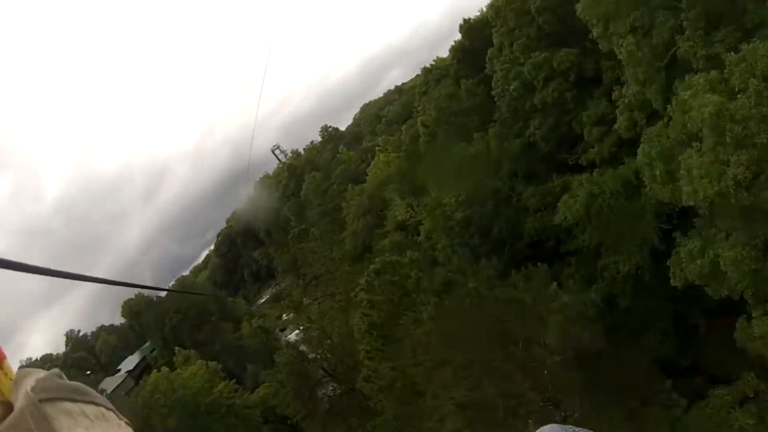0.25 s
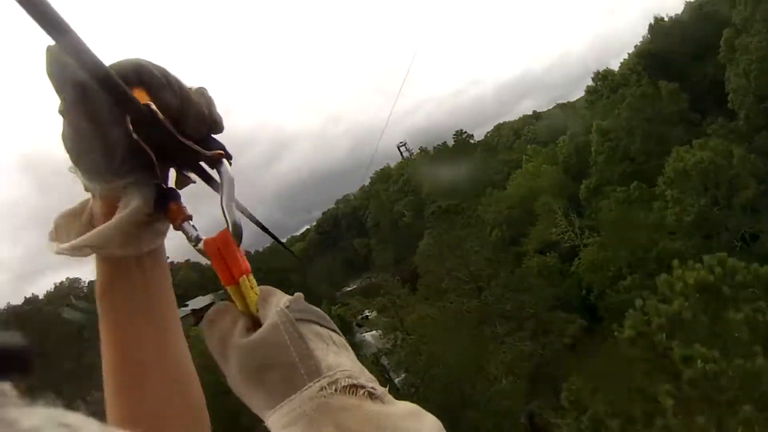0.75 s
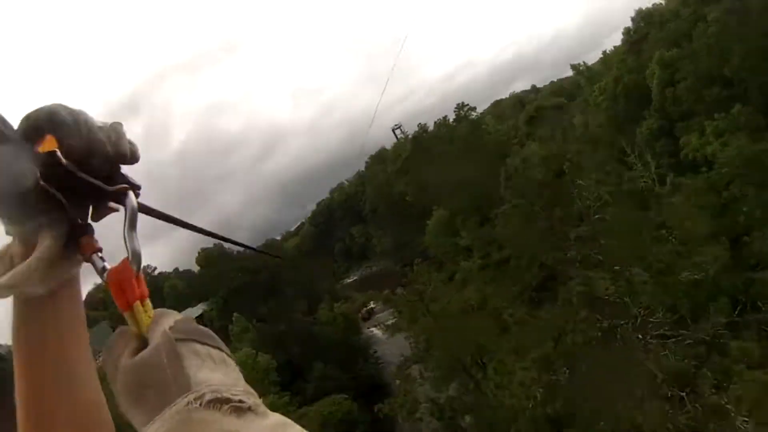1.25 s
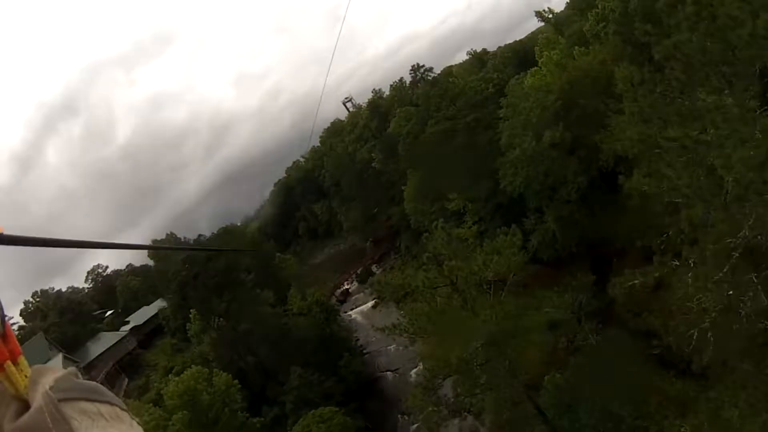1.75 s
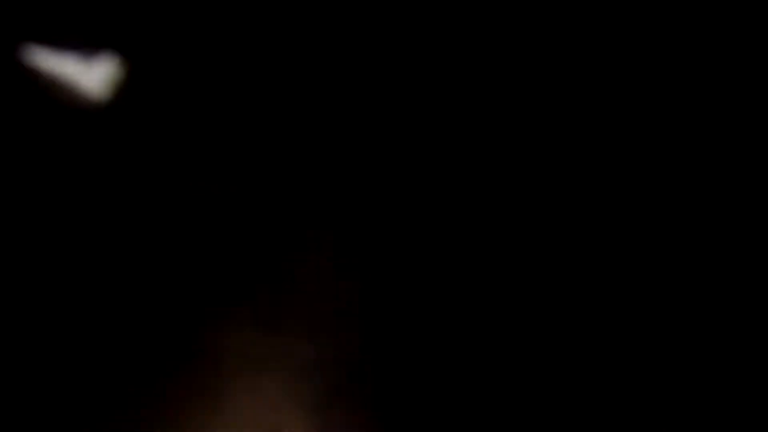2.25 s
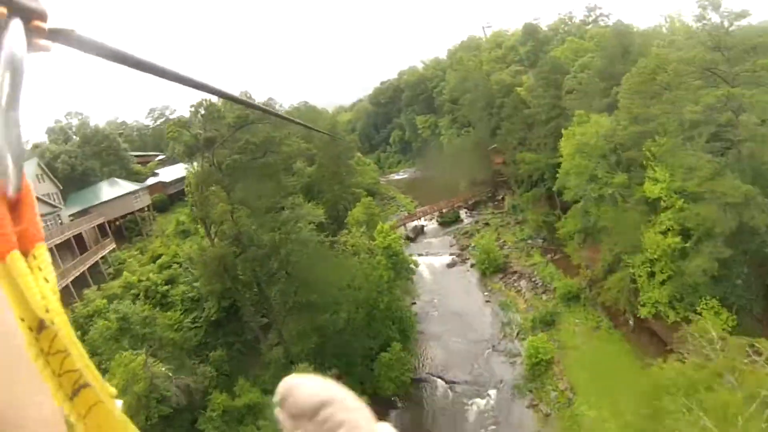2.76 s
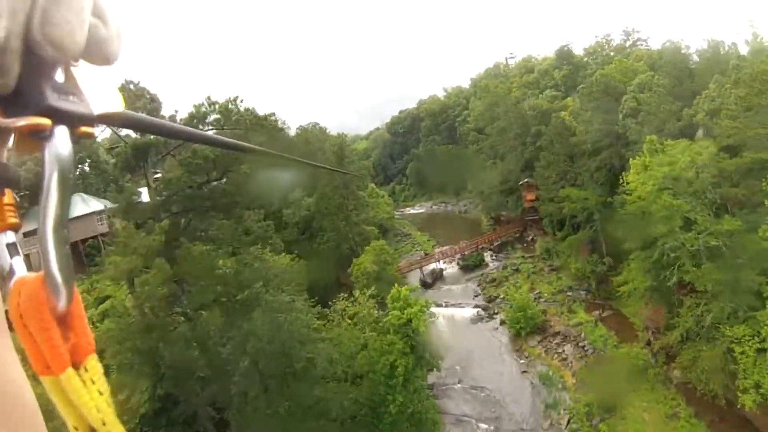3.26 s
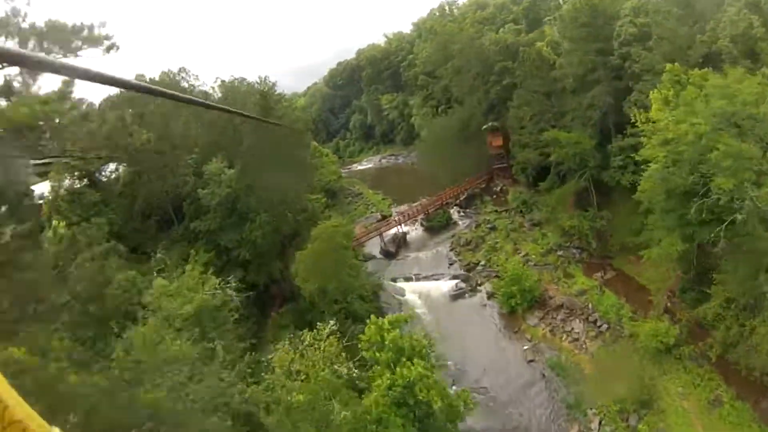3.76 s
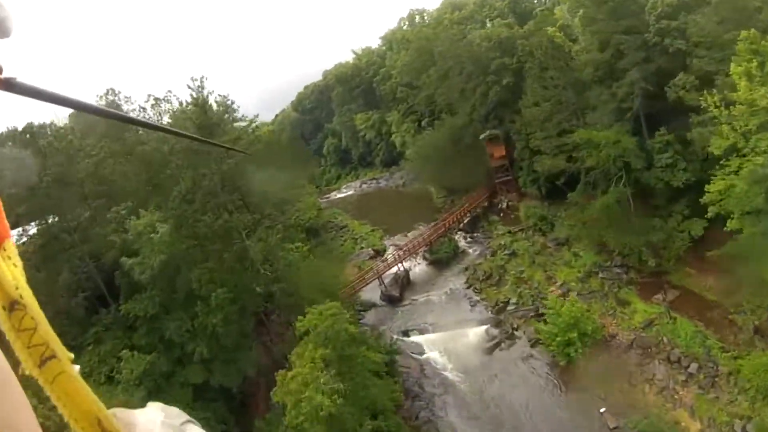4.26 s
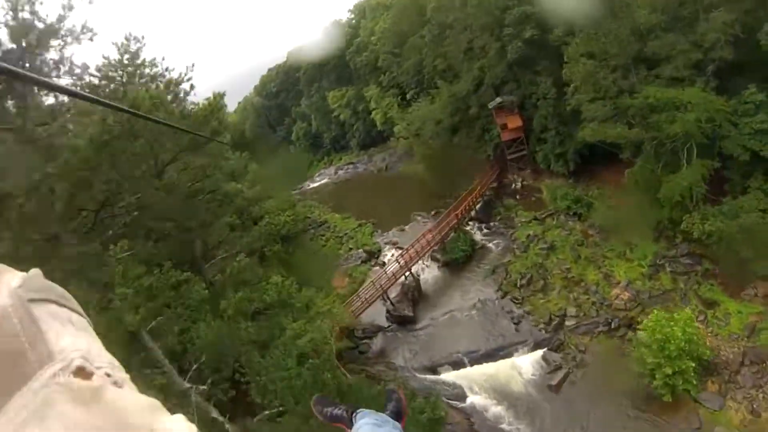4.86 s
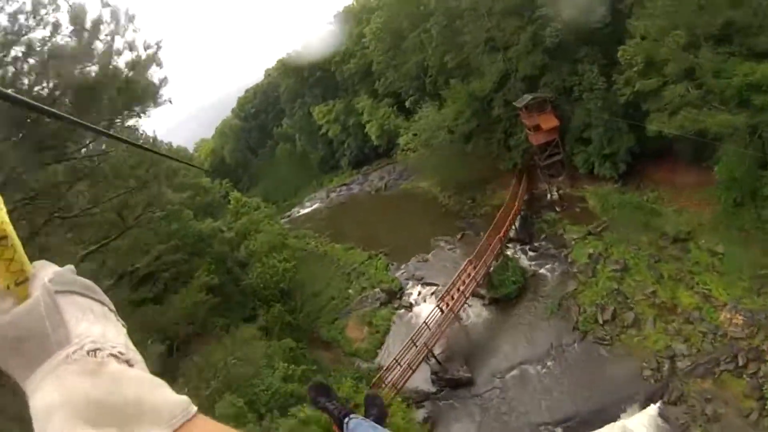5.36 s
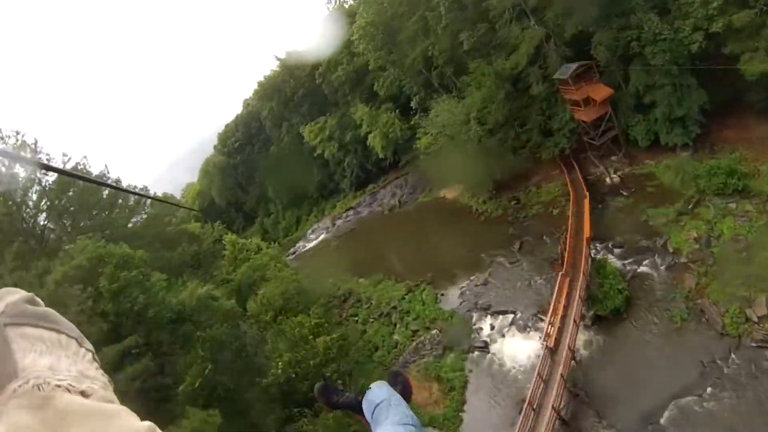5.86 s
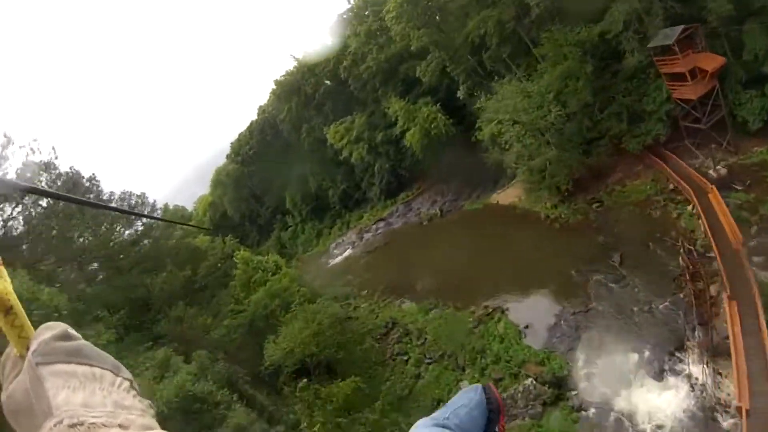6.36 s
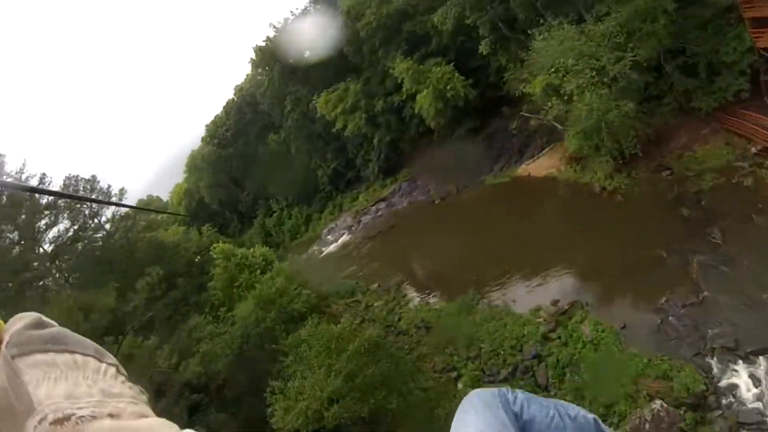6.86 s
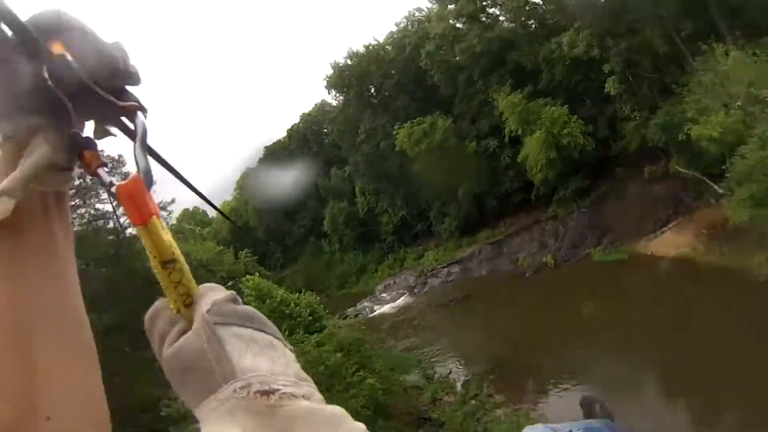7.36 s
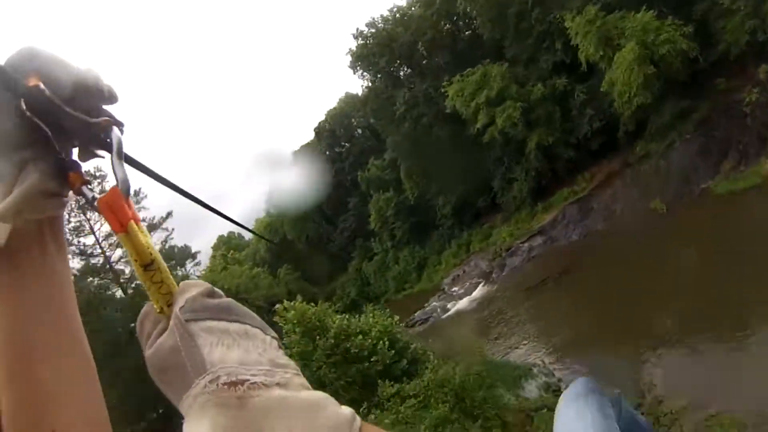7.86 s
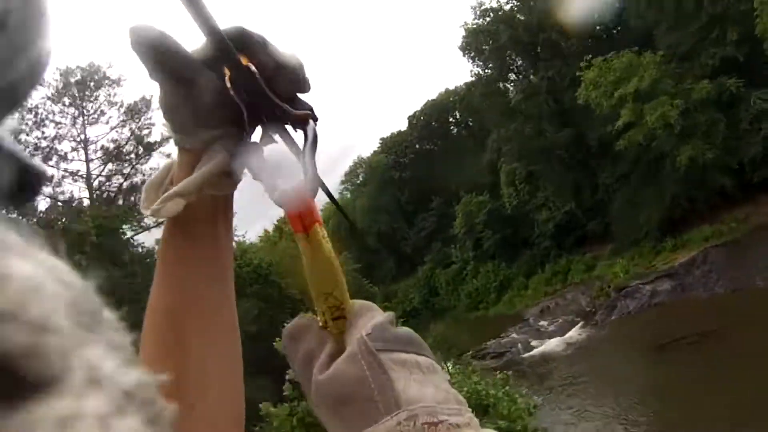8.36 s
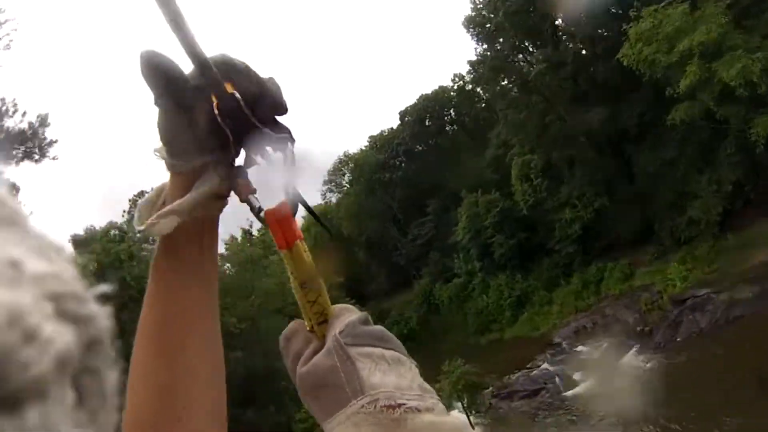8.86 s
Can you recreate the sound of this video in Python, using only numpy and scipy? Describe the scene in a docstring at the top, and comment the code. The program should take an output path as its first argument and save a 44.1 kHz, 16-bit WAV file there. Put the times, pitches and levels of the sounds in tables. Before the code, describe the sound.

A pulley trolley whines down a steel cable, faint at first then loud, slowly falling in pitch amid rumbling wind and hard buffets.

```python
"""Low wind rumble and a faint whine, struck by hard buffets from the start; the whine swells after 2.2 s.
A pulley trolley runs down a steel cable, heard from a helmet camera in a closed case.
The whine is three partials locked to the passing strands; rolling is noise in resonances of trolley and case.
Wind is flickering noise bands; buffets and glove claps are pressure spikes, scrapes are short ringing rubs.
After each spike the whine, rolling and wind drop at once and swell back."""
import sys
import numpy as np
from scipy import signal
from scipy.io import wavfile
from scipy.ndimage import uniform_filter1d

SR = 44100
rng = np.random.default_rng(int(sys.argv[2]) if len(sys.argv) > 2 else 0)


def dump(signal):
    """Clip the signal to [-1, 1] and save it as 16-bit WAV at the path in sys.argv[1]."""
    limited = np.clip(np.atleast_2d(signal).T, -1, 1)
    pcm = np.round(limited * 32767).astype(np.int16)
    wavfile.write(sys.argv[1], SR, pcm)


N = 401310


def undb(db):
    """dB to gain."""
    return 10 ** (np.asarray(db) / 20)


def unit(x):
    """Scale to rms 1."""
    return x / np.sqrt(np.mean(x ** 2))


def curves(table):
    """Columns of a table after the time column, drawn as straight lines with one value per sample."""
    s, *columns = np.transpose(table)
    return [np.interp(np.arange(N) / SR, s, column) for column in columns]


def ring(x, hz, width_hz):
    """One resonance, passing its centre at full level."""
    return signal.lfilter(*signal.iirpeak(hz, hz / width_hz, SR), x)


def walk(rate):
    """Smooth random movement of rms 1: levels held 1 / rate seconds, then slewed twice."""
    hold = int(SR / rate)
    steps = np.repeat(rng.standard_normal(N // hold + 1), hold)
    return unit(uniform_filter1d(uniform_filter1d(steps, hold), hold)[:N])


def band(hz, width_hz):
    """Steep-sided noise whose level per Hz does not depend on its width."""
    once = ring(rng.standard_normal(N), hz, 1.7 * width_hz)
    return unit(ring(once, hz, 1.7 * width_hz)) * np.sqrt(width_hz)


# Rate of cable strands under the wheels, sinking as the trolley slows and rocking as the rider swings.
# Each row: time in seconds, strand rate in Hz.
STRAND_RATE = [(0, 1354), (.35, 1392), (.47, 1389), (.64, 1364), (.85, 1402), (1.3, 1361), (1.71, 1389),
               (2.0, 1392), (2.19, 1376), (2.31, 1390), (2.54, 1363), (2.77, 1376), (2.91, 1360),
               (3.05, 1376), (3.19, 1361), (3.33, 1377), (3.5, 1380), (3.68, 1339), (3.89, 1341),
               (4.02, 1352), (4.31, 1333), (4.65, 1336), (4.77, 1318), (4.87, 1332), (5.26, 1348),
               (5.36, 1325), (5.44, 1335), (5.51, 1313), (5.59, 1332), (5.68, 1317), (5.8, 1318),
               (5.93, 1329), (6.38, 1324), (6.56, 1303), (6.78, 1350), (6.88, 1328), (7.03, 1306),
               (7.12, 1285), (7.22, 1294), (7.32, 1321), (7.5, 1277), (7.59, 1310), (7.79, 1268),
               (7.89, 1295), (8.0, 1303), (8.18, 1258), (8.41, 1247), (8.62, 1273), (8.74, 1273),
               (8.96, 1236), (9.1, 1233)]
# Second partial of the whine. Each row: time in seconds, level against the first partial in dB.
SECOND_PARTIAL = [(0, -8), (.3, -9), (.62, -20), (.9, -3), (1.3, -11), (1.8, -4), (2.2, -13), (2.55, -10),
                  (2.9, -12), (3.2, -7), (3.8, -13), (4.3, -11), (4.9, -10), (5.8, -15), (6.25, -24),
                  (6.6, -11), (7.05, -9), (7.56, -18), (7.84, -10), (8.05, -22), (8.25, -3), (8.45, -2),
                  (8.75, -6), (9.1, 0)]
# Third partial of the whine. Each row: time in seconds, level against the first partial in dB.
THIRD_PARTIAL = [(0, -20), (2.1, -17), (2.4, -14), (3.0, -17), (3.8, -25), (4.3, -14), (4.48, -17),
                 (4.62, -10), (4.9, -17), (5.2, -24), (7.2, -22), (7.6, -16), (9.1, -11)]
# How far each partial comes and goes. Each entry: rms drift in dB, lowest partial first.
PARTIAL_DRIFT = [1.7, 2, 2]
# The trolley, heard more or less openly as the head turns; rolling() plays the last two columns.
# Each row: time in seconds, whine level in dB, rolling level in dB per Hz, rolling tilt in dB per octave.
TROLLEY_LEVELS = [(0, -32.5, -53, -3), (.3, -31, -45.5, -2), (.6, -31, -52, -7.5), (.85, -40, -55.5, -5),
                  (1.0, -36, -39.5, -11), (1.14, -46, -45, -3), (1.27, -31, -47, -9), (1.55, -30, -49, 2.5),
                  (1.8, -41, -51, -2), (2.0, -31, -48.5, -1), (2.24, -19, -36.5, -3.5),
                  (2.38, -19, -42, -2.5), (2.46, -19, -40, 0), (2.54, -15.5, -34.5, 0),
                  (2.7, -16.5, -36.5, -1), (2.9, -15, -34.5, 1), (3.22, -23, -36.5, -1),
                  (3.45, -24.5, -34.5, 1), (3.64, -21, -36, -0.5), (3.8, -17, -34, 0),
                  (4.15, -20.5, -39, 0.5), (4.4, -16.5, -38, -0.5), (5.0, -16, -40, 1.5),
                  (5.2, -25, -46, -3), (5.45, -18, -42.5, 0), (6.2, -20, -47.5, -3.5),
                  (6.44, -28, -47.5, -1), (6.86, -22.5, -47, -0.5), (7.12, -27.5, -47, 1),
                  (7.28, -21, -43, 2), (7.44, -22.5, -49, -2), (7.58, -18, -46.5, 3), (7.8, -22.5, -44, 0),
                  (7.98, -21, -50, 2.5), (8.36, -33, -50.5, -6), (8.7, -27.5, -45, -1), (8.9, -31, -46, 2),
                  (9.1, -54, -56, 0)]


def whine():
    """Strands pass under the wheels almost evenly; uneven wires smear each partial, the upper ones most."""
    whine_db = curves(TROLLEY_LEVELS)[0]
    strand_hz = curves(STRAND_RATE)[0] + 2 * walk(12) + 2.5 * walk(30)
    turns = np.cumsum(strand_hz) / SR
    partial_db = [0, *curves(SECOND_PARTIAL), *curves(THIRD_PARTIAL)]
    smears = [.11, .3, .5]
    out = 0
    for number, (db, drift_db, smear) in enumerate(zip(partial_db, PARTIAL_DRIFT, smears), 1):
        # a complex sway moves both loudness and phase
        sway = 1 + smear * (walk(90) + 1j * walk(90))
        partial = unit(np.real(sway * np.exp(2j * np.pi * number * turns)))
        out = out + undb(whine_db + db + drift_db * walk(8)) * partial
    return out


# Resonances shaken by the wheels. Each row: centre in Hz, width in Hz, level from the trolley in dB,
# level in the case in dB; both levels add to the moving trolley and case levels.
SHAKEN_MODES = [(608, 85, -25, -16), (1185, 510, -22, -15.5), (1525, 190, -11.5, -14.5),
                (1936, 290, -17.5, -22), (2162, 80, -15, -18), (2499, 141, -7, -28),
                (3005, 280, -7.5, -20.5), (3580, 210, -19, -9.5), (3786, 150, -18, -26.5),
                (4186, 400, -20.5, -10), (4450, 82, -19, -13), (4790, 330, -22.5, -11.5),
                (5193, 390, -13.5, -37), (5630, 190, -19, -20.5), (6150, 76, -17, -12),
                (6486, 184, -39, -5), (6880, 305, -21, -14.5), (7130, 52, -20, -7.5),
                (7830, 650, -21.5, -20), (8170, 220, -26.5, -20), (9700, 340, -40, -24)]
# Dips cut into the rolling. Each row: centre in Hz, width in Hz.
ROLLING_DIPS = [(820, 500), (2720, 84), (3350, 80), (4600, 210), (5930, 49), (8700, 210), (11500, 250)]
# The case; wind() plays the last two columns. Each row: time in seconds, case buzz in dB per Hz,
# air hiss level in dB, hiss tilt in dB per octave.
CASE_LEVELS = [(0, -59, -47, -4), (.28, -48, -34.5, -4), (.7, -53.5, -41, -4), (1.0, -42, -32, -5),
               (1.26, -43, -33.5, -7), (1.45, -51, -35, -12), (1.96, -54.5, -43, -5),
               (2.24, -47.5, -30.5, -5), (2.52, -43.5, -32.5, 0), (3.0, -53, -35, 13),
               (3.36, -48, -35.5, 5), (3.64, -66, -35.5, -2), (3.88, -45, -30.5, 11), (4.1, -63, -39, 8),
               (4.4, -50, -37, 6), (4.65, -47, -36, 11), (5.2, -54, -42.5, 2), (5.46, -50, -40, 0),
               (6.2, -48, -43.5, 3), (7.1, -54, -41, -3), (7.6, -44.5, -29, -6), (7.9, -48, -40.5, 2),
               (8.12, -44.5, -29.5, -11), (8.4, -45.5, -34, -13), (8.65, -44.5, -32, -9),
               (8.85, -45, -31, -9), (9.1, -46.5, -32, -9)]
# A rush in the case buzz towards the end. Each row: time in seconds, lift at the rush centre in dB.
BUZZ_RUSH = [(0, 0), (7, 0), (7.8, 2), (8.5, 2), (8.85, 6), (9.1, 3)]
RUSH_HZ, RUSH_OCTAVES = 4100, .35  # centre, half-width where the lift in dB falls to 1/e


def rolling():
    """Wire roughness shakes each resonance; all judder together and each flickers alone."""
    _, trolley_db, tilt_db = curves(TROLLEY_LEVELS)
    case_db = curves(CASE_LEVELS)[0]
    rush_db = curves(BUZZ_RUSH)[0]
    judder_db = 0.66 * walk(150) + 0.93 * walk(12)
    out = 0
    for hz, width_hz, air_db, solid_db in SHAKEN_MODES:
        open_gain = undb(trolley_db + air_db + tilt_db * np.log2(hz / 2500))
        rush_share = np.exp(-(np.log2(hz / RUSH_HZ) / RUSH_OCTAVES) ** 2)
        case_gain = undb(case_db + solid_db + rush_db * rush_share)
        flicker_db = judder_db + 1.88 * walk(5) + 1.05 * walk(30)
        # the two paths add as powers
        out = out + np.hypot(open_gain, case_gain) * undb(flicker_db) * band(hz, width_hz)
    for hz, width_hz in ROLLING_DIPS:
        out = out - 0.65 * ring(out, hz, width_hz)
    return out


# Hard wind buffets. Each row: time in seconds, spike level in dB ahead of the recorder,
# push +1 or pull -1, depth of the following drop in dB.
WIND_BUFFETS = [(0.19, -10, 1, 6.5), (0.278, -7, -1, 5.5), (0.918, -3, -1, 18.5), (1.063, -7, -1, 9.5),
                (1.368, -12, 1, 4), (1.55, -3, -1, 1.5), (2.093, -5, -1, 7.5), (2.126, -1.5, -1, 6),
                (2.89, -4.5, -1, 10), (3.345, -8, 1, 5), (3.6, -2.5, 1, 8.5), (3.972, -13, 1, 4),
                (4.09, -10, -1, 3), (4.176, -5, 1, 7.5), (4.494, -4, 1, 7.5), (4.699, -3, -1, 5.5),
                (4.922, 0, -1, 7), (5.578, -9, -1, 6), (5.709, -3.5, 1, 4), (6.011, -4, -1, 3.5),
                (6.383, -3, -1, 4), (6.831, -6.5, -1, 0.5), (7.179, -4.5, 1, 7.5), (7.417, -8, 1, 7.5),
                (7.587, -15, 1, 5.5), (7.999, -10, -1, 8), (8.07, -6, 1, 2.5), (8.383, 2, -1, 17.5),
                (8.888, -5, -1, 5.5), (9.043, -14, -1, 5)]
# The glove claps onto the case and pulls away. Each row: time in seconds, spike level in dB ahead of
# the recorder, push +1 or pull -1, depth of the following drop in dB, spike half-width at 1/e in ms.
GLOVE_CLAPS = [(2.248, -2.5, 1, 15, 1.3), (2.262, -1, -1, 11, 3.8)]
BUFFET_MS = 1.86  # spike half-width at 1/e
BUFFET_REBOUND, GLOVE_REBOUND = .66, .08  # scale of the swing back against the spike
DROP_S, RECOVER_S = .0098, .16  # fall time, decay time of the drop in dB


def buffets_and_claps():
    """Each is a pressure spike with a slower rebound; also returns the level drop that follows, in dB."""
    t, thumps, drop_db = np.arange(N) / SR, np.zeros(N), np.zeros(N)
    spikes = [(*row, BUFFET_MS, BUFFET_REBOUND) for row in WIND_BUFFETS]
    spikes += [(*row, GLOVE_REBOUND) for row in GLOVE_CLAPS]
    for s, peak_db, sign, depth_db, width_ms, rebound in spikes:
        i = int(s * SR)
        since = t[i:] - t[i]
        drop_db[i:] += depth_db * np.clip(since / DROP_S, 0, 1) * np.exp(-since / RECOVER_S)
        near = slice(i - 800, i + 2000)
        u = (t[near] - s) * 1000 / width_ms  # time in half-widths
        swing = np.exp(-((u - 3) / 2.0) ** 2) - 0.26 * np.exp(-((u - 7) / 2.9) ** 2)
        thumps[near] += sign * undb(peak_db) * (np.exp(-u ** 2) - rebound * swing)
    return thumps, drop_db


# Scrapes on the case. Each row: start in seconds, length in seconds, low ring level in dB,
# high ring level in dB, broad rasp level in dB.
CASE_SCRAPES = [(0.974, 0.011, -41, -25, -44), (0.996, .01, -32, -28, -42), (1.004, 0.014, -24.5, -35, -40),
                (1.017, 0.0184, -32, -21, -45), (1.032, 0.052, -34.5, -36, -49), (2.21, .02, -37, -45, -51),
                (2.241, .014, -33, -33, -31), (7.543, 0.03, -30, -34, -42), (8.56, 0.065, -36, -38, -53),
                (8.75, .075, -36, -47, -43)]
# Low ring, high ring and broad rasp. Each row: centre in Hz, width of the driving noise in Hz.
RINGS_AND_RASP = [(635, 60), (1600, 45), (900, 1200)]
RUB_EDGE_S = .002  # fade at each end of a rub


def scrapes():
    """Short rubs rasp and ring two hollow resonances of the case."""
    t, out = np.arange(N) / SR, 0
    for k, (hz, width_hz) in enumerate(RINGS_AND_RASP):
        rub = np.zeros(N)
        for start, length, *levels_db in CASE_SCRAPES:
            to_edge = np.minimum(t - start, start + length - t)
            rub += undb(levels_db[k]) * np.clip(to_edge / RUB_EDGE_S, 0, 1)
        held = np.tanh(2.3 * unit(band(hz, width_hz)))  # steady pressure keeps the ring from dropping out
        out = out + rub * unit(ring(held, hz, 3 * width_hz))
    return out


def throb():
    """Eddies shed at a wandering rate: a narrow low band that drifts in pitch."""
    turns = np.cumsum(54 * 2 ** (.25 * walk(4))) / SR
    sway = walk(22) + 1j * walk(22) + 0.57
    return unit(np.real(sway * np.exp(2j * np.pi * turns)))


def bands(table, shared_db, own_db, rate, tilt_db=0):
    """Noise bands with a shared and an own flicker, tilted about the first band and scaled to rms 1."""
    out = 0
    for hz, width_hz, db in table:
        level_db = db + shared_db + own_db * walk(rate) + tilt_db * np.log2(hz / table[0][0])
        out = out + undb(level_db) * band(hz, width_hz)
    return unit(out)


# Slow wind rumble. Each row: centre in Hz, width in Hz, level per Hz against the other bands in dB.
RUMBLE_BANDS = [(34.4, 13.5, -4.5), (53.1, 15, 0), (81.5, 19.8, -3.5)]
# Wind flutter. Each row: centre in Hz, width in Hz, level per Hz against the other bands in dB.
FLUTTER_BANDS = [(112.6, 42.3, 0.5), (171, 50, -1.5), (241.2, 53, -5.5), (292, 22, -16), (480, 193, -29)]
# Thin air hiss. Each row: centre in Hz, width in Hz, level per Hz against the other bands in dB.
HISS_BANDS = [(9360, 1500, 3), (10880, 860, -1), (12050, 830, -1.5), (14100, 1400, -10.5)]
# Gusts on the microphone, shaded for a moment by the glove.
# Each row: time in seconds, rumble level in dB, flutter level in dB.
GUSTS = [(0, -18.5, -24), (.28, -10.5, -20.5), (.84, -17.5, -22.5), (1.0, -8, -17), (1.4, -12.5, -19.5),
         (1.95, -15, -27), (2.1, -12, -16.5), (2.38, -15.5, -31), (2.68, -25, -28.5), (2.85, -19, -25),
         (2.93, -10.5, -25), (3.3, -15.5, -25.5), (3.64, -12, -23.5), (4.5, -13.5, -21.5),
         (5.3, -14.5, -24), (6.1, -14.5, -19.5), (6.35, -12.5, -23.5), (7.0, -15, -27.5),
         (7.42, -12.5, -18.5), (7.84, -13, -20), (8.26, -11.5, -18), (8.8, -14.5, -21), (9.1, -9.5, -23.5)]


def wind():
    """Eddies over the microphone port: slow rumble, flickering flutter, thin hiss."""
    _, hiss_db, tilt_db = curves(CASE_LEVELS)
    rumble_db, flutter_db = curves(GUSTS)
    eddies = walk(25)
    rumble = 0.77 * bands(RUMBLE_BANDS, 1.0 * eddies, 0.87, 3.93) + 0.65 * throb()
    flutter = bands(FLUTTER_BANDS, 2.18 * eddies, 1.04, 20)
    hiss = bands(HISS_BANDS, 0.86 * walk(150), 3.3, 5, tilt_db)
    return undb(rumble_db) * rumble + undb(flutter_db) * flutter + undb(hiss_db) * hiss


def helmet(x):
    """A short treble echo off the helmet; its lag drifts as the head turns, so dips slide through the treble."""
    lag = SR * .00045 * 2 ** (.12 * walk(1.5))  # in samples, around 0.45 ms
    place = np.arange(N)
    echo = np.interp(place - lag, place, ring(x, 12000, 5200))
    return x + .3 * echo


def scene():
    """Whine, rolling and wind share the level drops; spikes and scrapes ride on top."""
    thumps, drop_db = buffets_and_claps()
    steady = whine() + helmet(rolling() + wind())
    return (steady * undb(-drop_db) + thumps + scrapes())[None]


def record(dry):
    """The camera rounds the loudest peaks and cuts the top."""
    rounded = np.tanh(0.77 * dry) / 0.84
    top_cut = signal.ellip(14, .2, 80, 15260, fs=SR, output="sos")  # ripple and stopband in dB, edge in Hz
    return signal.sosfilt(top_cut, rounded)


dry = scene()
out = record(dry)
dump(out)
```